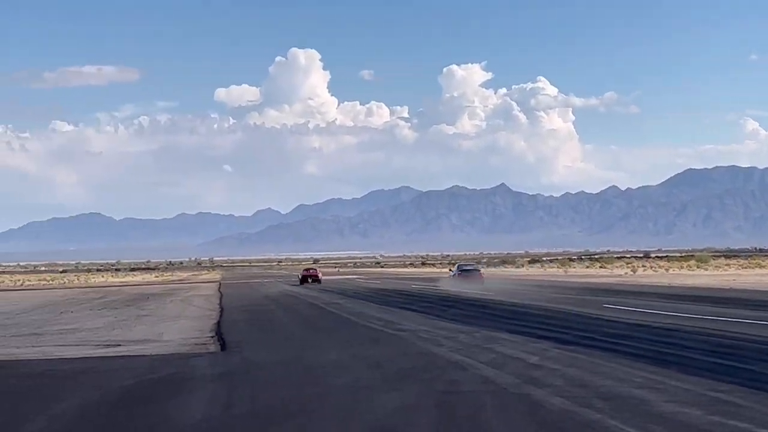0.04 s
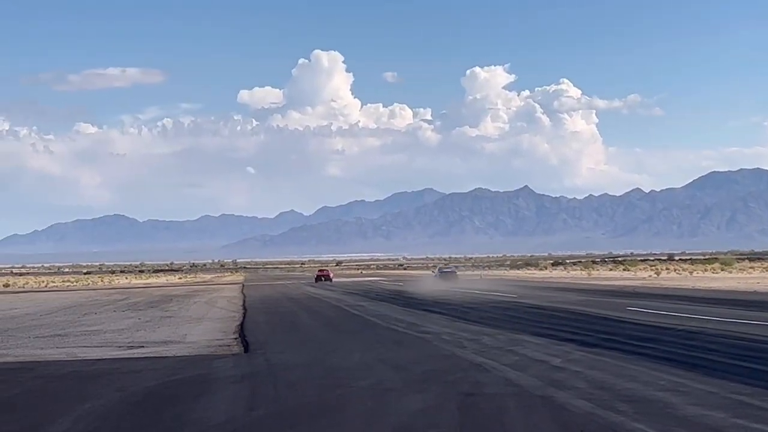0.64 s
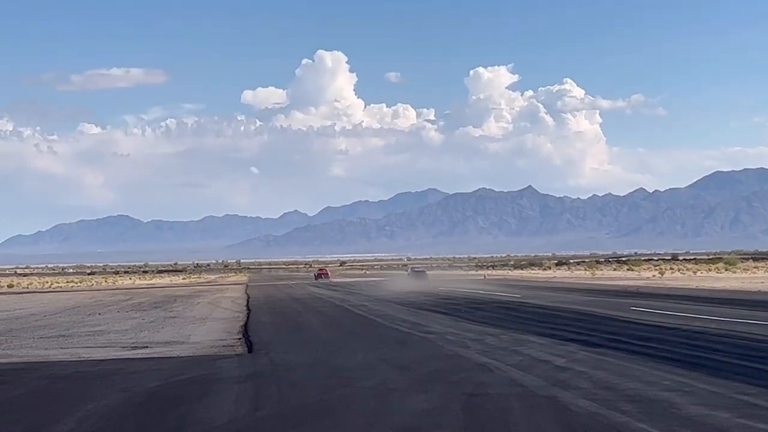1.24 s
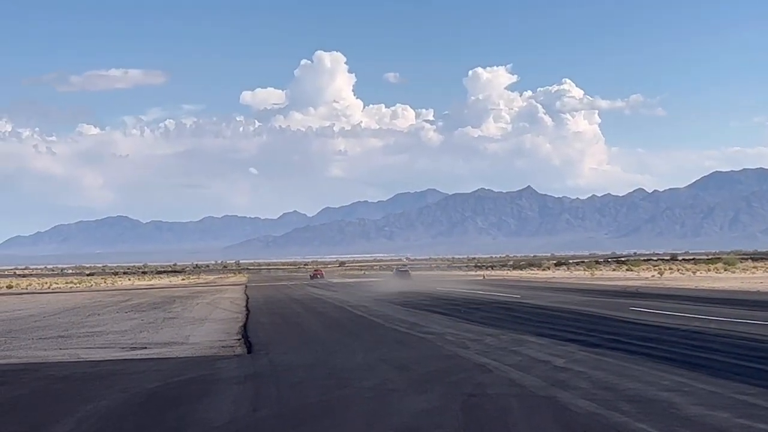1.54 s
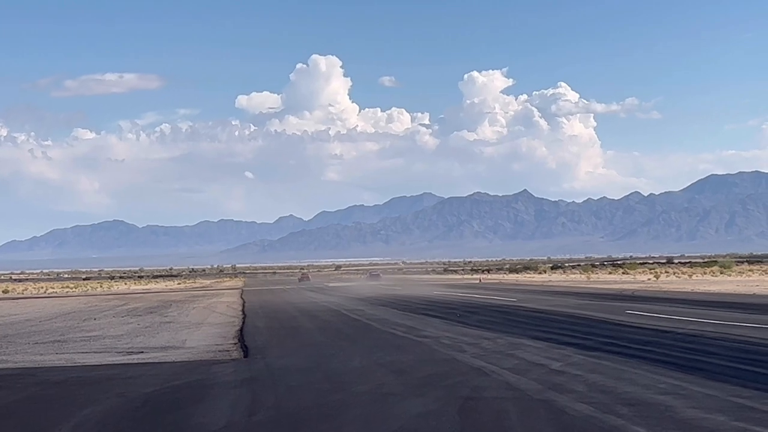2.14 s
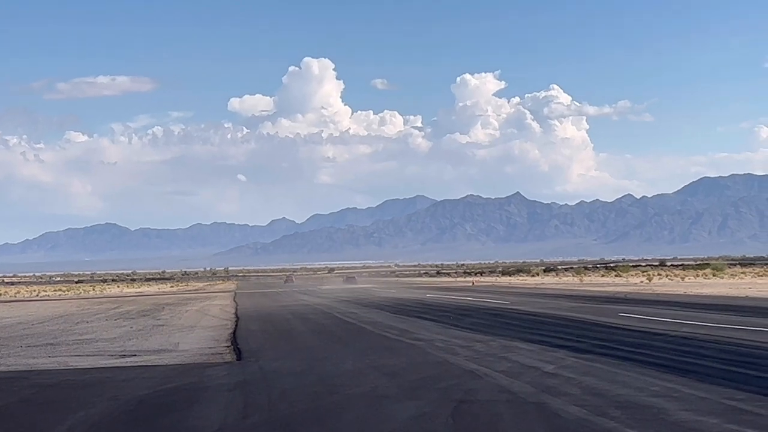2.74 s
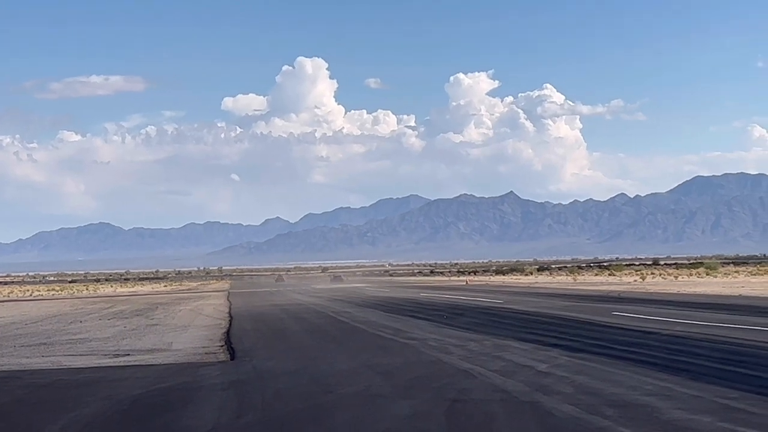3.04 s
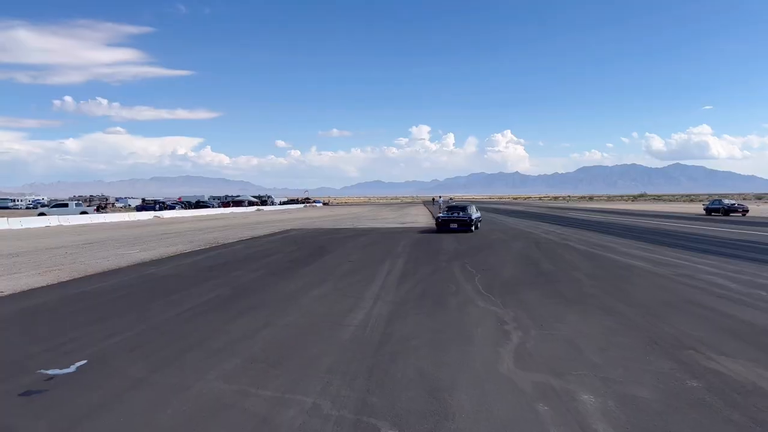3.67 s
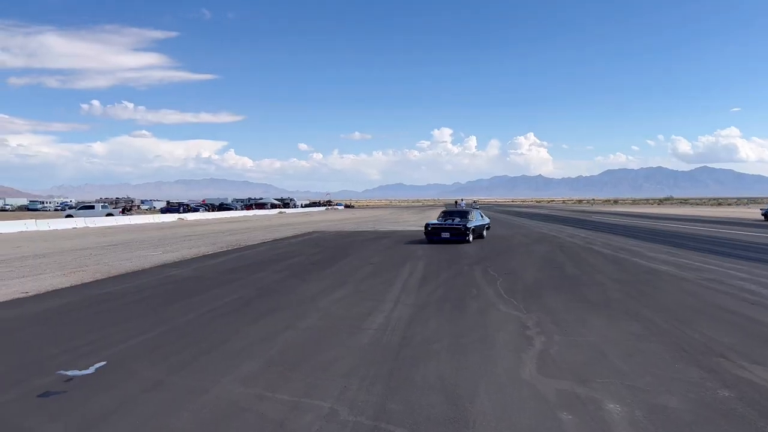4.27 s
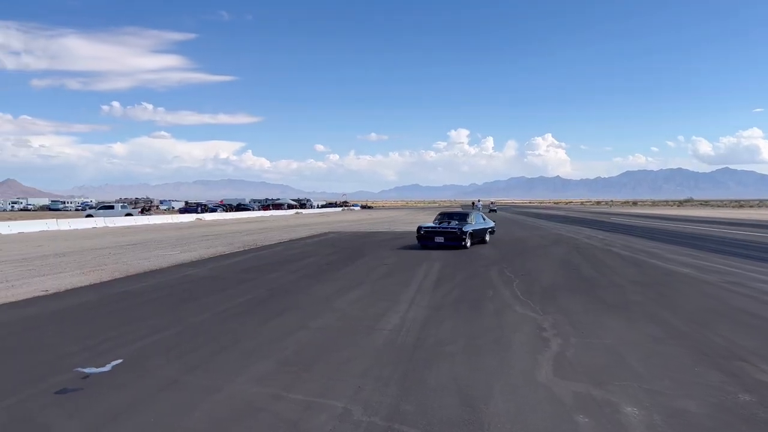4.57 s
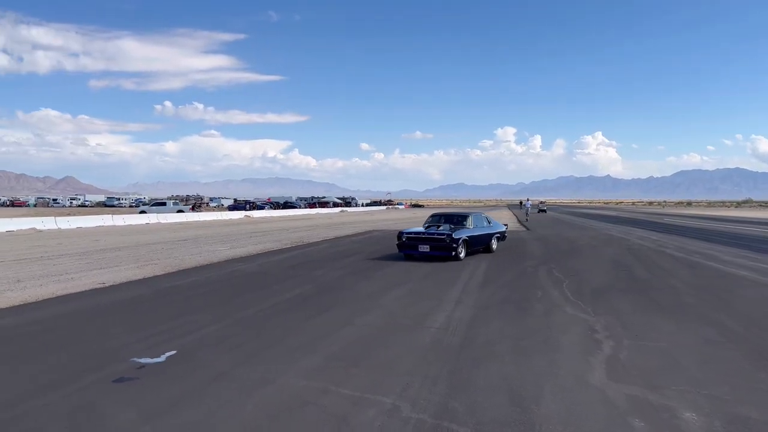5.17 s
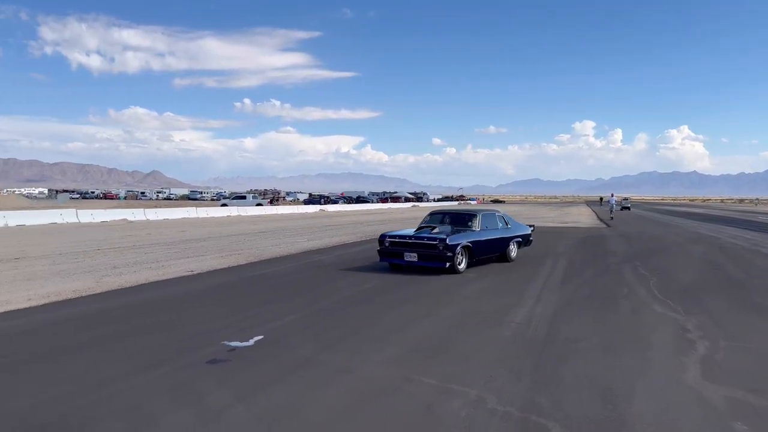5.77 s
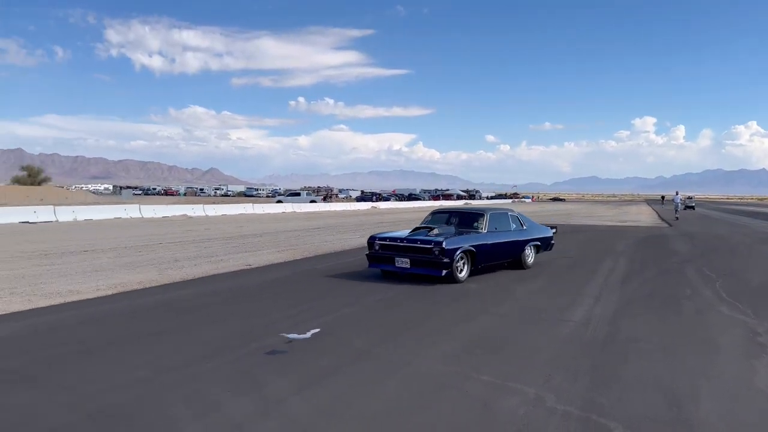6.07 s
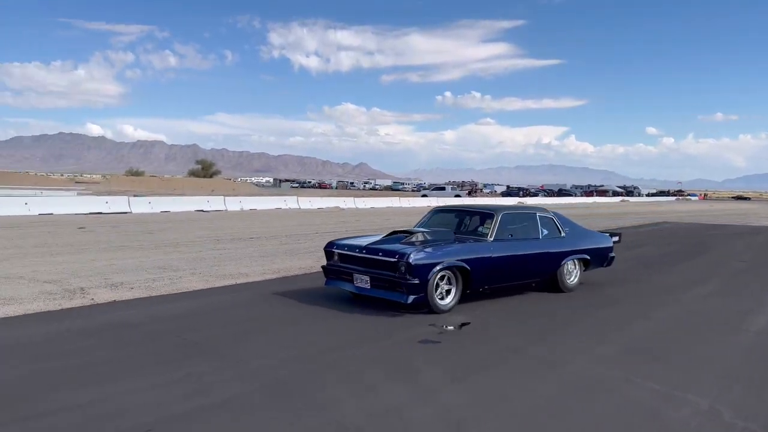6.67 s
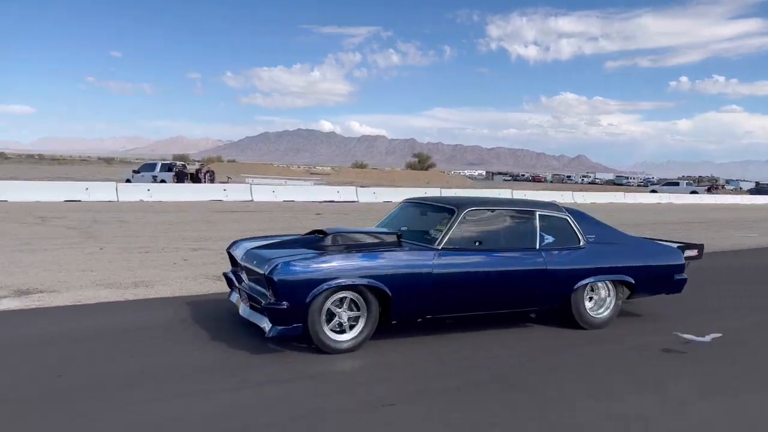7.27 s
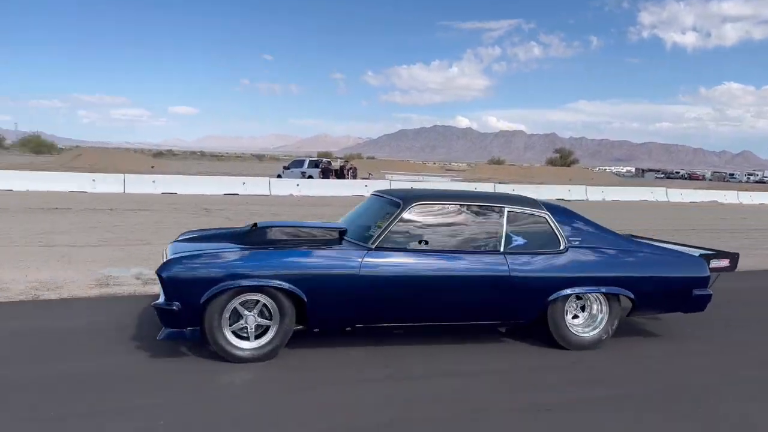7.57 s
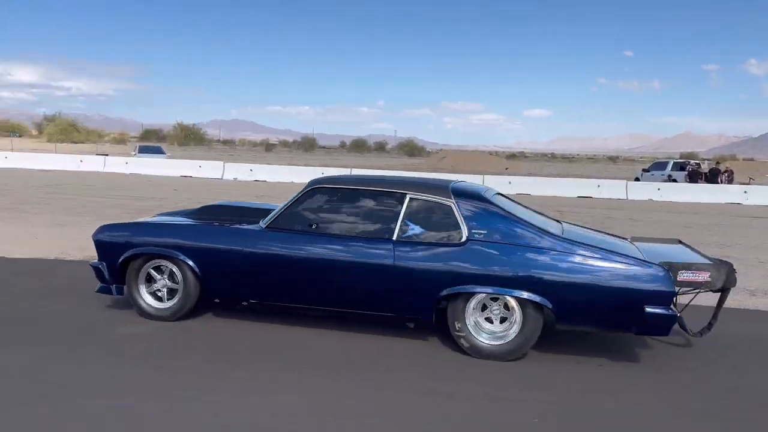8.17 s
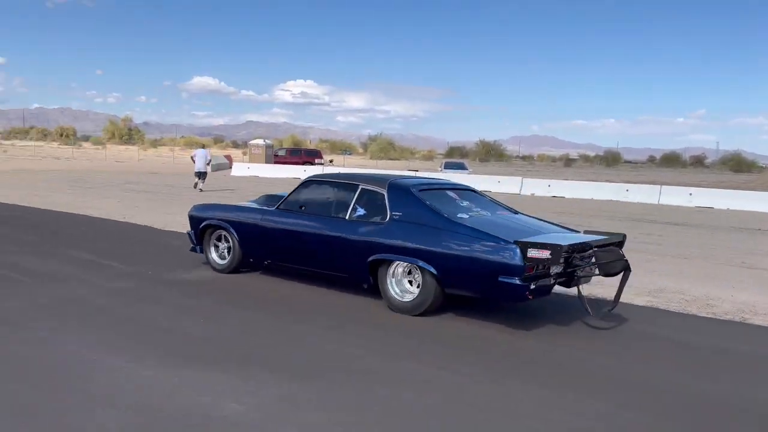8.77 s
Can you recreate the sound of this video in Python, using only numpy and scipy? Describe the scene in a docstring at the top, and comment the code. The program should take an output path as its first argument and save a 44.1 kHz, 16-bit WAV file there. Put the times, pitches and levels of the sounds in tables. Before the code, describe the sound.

Outdoors on a wide airstrip, the wavering whine of two racing engines recedes from the microphone, dips at the gear changes and stops, leaving a faint rumble and breeze. The sound then switches suddenly to a big, loud V8 rolling slowly by at close range. Its deep, uneven idle throbs at first, then turns raspier, spitting and barking as the open exhaust comes alongside, before dropping suddenly into the distance at the very end.

```python
"""Two race cars wail away flat out down an open desert airstrip, shift, fade and lift off.
Then a big V8 drag car rolls past a few metres away at a fast, lumpy idle: its open pipes boom,
and between the throbs they bark. For the last moment the idle is farther off.
The racers are harmonics of the engine cycle over turbulent noise. The V8 throbs as two pipe tones
beat; its firing pulses ring the pipes and chop the escaping gas into growl and crackle."""
import sys
import numpy as np
from scipy import signal
from scipy.fft import rfft, irfft, next_fast_len
from scipy.io import wavfile
from scipy.ndimage import uniform_filter1d, minimum_filter1d, map_coordinates

SR = 44100
rng = np.random.default_rng(int(sys.argv[2]) if len(sys.argv) > 2 else 0)


def log_audio(samples):
    """Write samples as a 16-bit WAV file to the path given in sys.argv[1]."""
    # one column per channel
    frames = np.atleast_2d(samples).T
    # limit to full scale, then quantise
    limited = np.clip(frames, -1, 1)
    pcm = np.round(limited * 32767).astype(np.int16)
    wavfile.write(sys.argv[1], SR, pcm)


N = 397782
TIME, FREQS = np.arange(N) / SR, np.maximum(np.arange(N // 2 + 1) * SR / N, 1)
LIFT_OFF_S, ARRIVES_S, LEAVES_S = 2.88, 3.636, 8.89   # the throttles close; the V8 is near; it is far
GONE = TIME > LEAVES_S


def from_db(db):
    """Decibels to amplitude ratio."""
    return 10 ** (np.asarray(db) / 20)

def rms_one(x):
    """Scale to unit power."""
    return x / np.sqrt(np.mean(x ** 2) + 1e-20)

def in_time(rows):
    """Each column of a curve, interpolated at every sample."""
    s, *columns = np.transpose(rows)
    return [np.interp(TIME, s, c) for c in columns]

def at_hz(points):
    """A spectrum interpolated over log frequency."""
    hz, value = np.transpose(points)
    return np.interp(np.log(FREQS), np.log(hz), value)

def filtered(x, gain):
    """Multiply the spectrum by a frequency response."""
    size = next_fast_len(N, True)
    response = np.interp(np.arange(size // 2 + 1) * SR / size, FREQS, gain)
    return irfft(rfft(x, size) * response, size)[..., :N]

def resonance(x, hz, width):
    """Two like damped resonators in series; unit power."""
    r = np.exp(-np.pi * width / SR)
    for _ in range(2):
        x = rms_one(signal.lfilter([1, 0, -1], [1, -2 * r * np.cos(2 * np.pi * hz / SR), r * r], x))
    return x

def delayed(channels, lag):
    """A variable delay, in samples."""
    return np.array([map_coordinates(c, [np.arange(N) - lag], order=3, mode="nearest") for c in channels])

def drift(rate_hz):
    """Low-passed random fluctuation of unit spread."""
    r = np.exp(-80 * np.pi * rate_hz / SR)
    slow = signal.lfilter([1], [1, -2 * r, r * r], rng.standard_normal(N // 40 + 2002))[2000:]
    return np.interp(np.arange(N) / 40, np.arange(len(slow)), rms_one(slow))

def noise():
    """Two uncorrelated white noises."""
    return rng.standard_normal((2, N))

def coloured(spectrum, drive):
    """Partial coherence: mid and side drives make a stereo sound of this spectrum and unit power."""
    # likeness of left and right: frequency_hz, coherence
    likeness = [(30, .6), (70, .75), (130, .88), (290, .8), (640, .78), (1400, .62), (3500, .62),
                (8000, .8), (15000, .85)]
    alike, gain = at_hz(likeness), from_db(at_hz(spectrum))
    mid = filtered(drive[0], gain * np.sqrt(1 + alike))
    side = filtered(drive[1], gain * np.sqrt(1 - alike))
    return rms_one(np.array([mid + side, mid - side]))

def turned(speed):
    """Engine cycles completed: the integral of speed."""
    return np.cumsum(in_time(speed)[0]) / SR

def whole_turns(phase):
    """The samples at which a phase completes a turn."""
    return np.flatnonzero(np.diff(np.floor(phase)) > 0)

def bursts(times_s, level_db, spread_db, rise_s, decay_s):
    """Envelope of transients: each rises fast and decays exponentially."""
    out, age, chance = np.zeros(N), np.arange(SR // 10) / SR, rng.standard_normal(N)
    shape = (1 - np.exp(-(age / rise_s) ** 2)) * np.exp(-age / decay_s)
    for s, db, luck in zip(times_s, level_db, chance):
        start = int(s * SR)
        out[start:start + len(age)] += (from_db(db + spread_db * luck) * shape / shape.max())[:N - start]
    return out

def engine_tone(cycles, orders, waver_db, waver_hz, smear_rad):
    """Harmonics of the engine cycle, modulated in amplitude and phase; the smear is that of order 8."""
    tone = 0
    for order, db in orders:
        amplitude = from_db(db + waver_db * drift(waver_hz))
        phase = 2 * np.pi * (order * cycles + rng.random())
        tone += amplitude * np.sin(phase + smear_rad * order / 8 * drift(waver_hz))
    return tone

def leading_racer():
    """Periodic firing gives a tone at order 8 amid other harmonics, all wavering in restless air."""
    # engine speed: time_s, cycle_hz
    speed = [(0, 45.9), (.3, 45.0), (.42, 45.1), (.55, 46.2), (.95, 46.8), (1.12, 46.1), (1.47, 47.1),
             (1.62, 46.7), (1.75, 46.85), (2.02, 45.8), (2.28, 42.7), (2.75, 43.65), (2.95, 43.5)]
    # loudness: time_s, firing_db, overtones_db
    levels = [(0.03, -41, -28), (0.06, -36.5, -33.5), (1.24, -32, -34.5), (1.32, -36, -33.5),
              (1.41, -27.5, -33.5), (1.99, -34.5, -40.5), (2.28, -44, -47.5), (2.58, -37, -41),
              (2.86, -38.5, -46.5)]
    # harmonics around the firing tone: order, level_db
    orders = [(2, -12.5), (3, -16.5), (4, -6), (5, -10.5), (6, -11), (7, -16.5), (9, -9), (10, -3),
              (11, -5.5), (12, -15), (13, -13), (14, -17.5), (15, -15), (16, -6.5), (17, -12), (18, -12),
              (19, -14), (20, -15.5), (21, -16.5), (23, -26), (24, -23), (26, -30), (29, -24)]
    cycles = turned(speed)
    firing_db, overtones_db = in_time(levels)
    firing = engine_tone(cycles, [(8, 0)], waver_db=1.2, waver_hz=6, smear_rad=.05)
    overtones = engine_tone(cycles, orders, waver_db=3.5, waver_hz=4, smear_rad=.12)
    return from_db(firing_db + 2.8) * firing + from_db(overtones_db - 1.8) * overtones

def chasing_racer():
    """A second harmonic series: its pitch drops at the upshift, its treble sinks with distance."""
    # engine speed: time_s, cycle_hz
    speed = [(0, 51.2), (.38, 50.5), (.6, 52), (1.0, 52.5), (1.13, 43), (1.4, 42.4), (1.75, 42.4),
             (1.95, 43.2), (2.9, 43.6)]
    # loudness: time_s, level_db, upper_overtones_db
    levels = [(0, -45.5, 10.5), (.4, -52, 7.5), (.9, -45, 7.5), (1.15, -44.5, -14), (1.4, -42, 4.5),
              (2.0, -40, -9), (2.35, -45.5, -13), (2.9, -43.5, -20)]
    # harmonics: order, level_db
    orders = [(2, -16.5), (3, -8.5), (4, 3), (5, -1.5), (6, -9.5), (8, 0.5), (9, -4.5), (10, -15.5),
              (12, -25.5), (16, -2), (17, -16.5), (18, -18.5), (19, -16.5), (23, -18)]
    # wail at the octave of the firing tone: time_s, boost_db
    wail = [(0, 0), (.2, 5), (.5, 2), (.65, 0)]
    level_db, bright_db = in_time(levels)
    wail_db, = in_time(wail)
    voiced = [(k, db + bright_db * (k > 8) + wail_db * (k == 16)) for k, db in orders]
    return from_db(level_db) * engine_tone(turned(speed), voiced, waver_db=4, waver_hz=.92, smear_rad=.12)

def far_roar(throttle):
    """The racers' low broadband noise attenuates with distance and drops at lift-off."""
    # roar: frequency_hz, density_db
    spectrum = [(15, -45.5), (25, -18), (32, -9.5), (38, -5.5), (107, -0.5), (172, 3), (419, -8),
                (447, -9.5), (726, -24), (800, -20), (1200, -43.5), (1560, -70), (2640, -120)]
    level_db = -39.5 - 1.33 * TIME - 2.5 * (1 - throttle)
    return from_db(level_db + 2.6 * drift(8)) * coloured(spectrum, noise())

def far_rasp(throttle):
    """Exhaust turbulence attenuates with distance; faint knocks sound in the lull after lift-off."""
    # rasp: frequency_hz, density_db
    spectrum = [(240, -29.5), (400, -3), (461, -5.5), (517, -4.5), (571, -12.5), (815, -4.5), (1040, -12),
                (1210, -12.5), (1460, -22.5), (1900, -27.5), (2930, -32.5), (8900, -57), (10600, -78.5),
                (15600, -117)]
    # knocks: start_s, level_db
    knocks = [(3.286, -55), (3.407, -51), (3.434, -49)]
    knock_s, knock_db = np.transpose(knocks)
    knocking = bursts(knock_s, knock_db - 9, spread_db=0, rise_s=.002, decay_s=.01)
    upshift_dip_db = 4 * np.exp(-((TIME - 2.32) / .19) ** 2)   # the leader changes up
    level = throttle * from_db(-39 - 4.5 * TIME - upshift_dip_db) + from_db(-72) + knocking
    return level * from_db(.7 * drift(11) + 1.1 * drift(1.5)) * coloured(spectrum, noise())

def breeze():
    """Wind at the listener: low pressure fluctuations, largely common to both sides."""
    # gust strength: time_s, level_db
    gusts = [(0, -49), (.9, -61.5), (1.6, -58), (2.0, -42.5), (2.8, -48.5), (3.6, -57)]
    # wind: frequency_hz, density_db
    spectrum = [(15, -24.5), (32, -11), (60, 8), (100, -8), (200, -20.5), (600, -92)]
    level = from_db(in_time(gusts)[0] + 2 * drift(4))
    return level * rms_one(filtered(noise() + 1.7 * rng.standard_normal(N), from_db(at_hz(spectrum))))

def exhaust_surges():
    """Swells of band-limited noise turn the racers' exhaust briefly hoarse or sizzling."""
    # hoarse moments: centre_s, length_s, level_db
    hoarse_swells = [(1.318, .15, -34), (1.915, 0.23, -36.5)]
    # bright moments: centre_s, length_s, level_db
    sizzle_swells = [(.08, 0.28, -62), (1.1, .25, -68), (1.45, 0.33, -69)]
    # hoarseness: frequency_hz, density_db
    spectrum = [(150, -18), (230, -6.5), (480, 1.5), (600, -9), (800, -2.5), (950, -20.5), (1500, -46),
                (3000, -120)]
    hoarse, sizzle = (sum(from_db(db) * np.exp(-(2 * (TIME - s) / length) ** 4) for s, length, db in rows)
                      for rows in (hoarse_swells, sizzle_swells))
    return hoarse * coloured(spectrum, noise()) + sizzle * resonance(noise(), hz=3050, width=900)

def racers():
    """Engines, roar and wind superpose; the engine tones stop as the throttles close."""
    throttle = np.clip(1 - (TIME - LIFT_OFF_S) / .041, 0, 1)
    engines = leading_racer() + chasing_racer()
    background = far_roar(throttle) + far_rasp(throttle) + breeze()
    return ((engines + exhaust_surges()) * throttle + background) * from_db([[.35], [-.35]])

def side_on(s):
    """Aspect of the V8: 0 while it faces the listener, 1 once its pipes are in view."""
    return np.interp(s, [5.3, 6.7], [0, 1])

def firings(cycles, jitter_s, uneven_db):
    """A pulse train, eight to the cycle, uneven in time and strength."""
    at = whole_turns(8 * cycles)
    timing, strength = rng.standard_normal((len(at), 2)).T
    pulses = np.zeros(N)
    pulses[np.clip(at + (jitter_s * SR * timing).astype(int), 0, N - 1)] = from_db(uneven_db * strength)
    return rms_one(pulses)

def boom(cycles, lope):
    """Beating: the pipes' strong tone and a lower one interfere destructively once in every lope."""
    # depth of the beat: time_s, lower_to_upper_ratio
    throb = [(3.7, 0.49), (4.3, 0.94), (4.75, 0.59), (5.05, 1.67), (5.3, 0.64), (5.7, 0.44), (6.2, 0.43),
             (6.9, 0.64), (7.4, 0.51), (8.8, 0.22)]
    # harmonics spread by uneven firing: order, level_db
    orders = [(5, -26), (6, -27), (7, -8), (8, -8), (9, -7.5), (10, -8), (12, -30), (13, -19.5),
              (14, -15.5), (15, -13.5), (16, -17.5), (19, -20.5), (20, -24.5)]
    # deep shudder: frequency_hz, density_db
    shudder = [(15, -19), (30, -32), (45, -4), (65, 16.5), (90, 21), (130, -32.5)]
    ratio, = in_time(throb)
    upper = np.exp(2j * np.pi * 11 * cycles)
    tone = upper * (1 - ratio * np.exp(-2j * np.pi * lope)) / np.sqrt(1 + ratio ** 2)
    # strong pressure waves steepen in the pipe and gain overtones
    steepened = np.imag(tone + .047 * (.53 * tone ** 2 + .15 * tone ** 3))
    uneven = .5 + .55 * side_on(TIME - 1)   # lumpier once the car is alongside
    lumps = uneven * engine_tone(cycles, orders, waver_db=2.4, waver_hz=2, smear_rad=.4)
    return rms_one(steepened + lumps) + from_db(-22) * coloured(shudder, noise())

def barks(cycles, lope, growl_db, hiss_db):
    """Exhaust transients, on the lope and off it: start_s, growl_db, crack_db, burn_s."""
    # the hardest barks: start_s, growl_db, crack_db, burn_s
    hard_barks = [(5.725, -21, -25, .06), (5.827, -20, -28, .035), (5.878, -16, -23, .05),
                  (5.974, -19, -24, .085), (6.117, -17, -24, .065), (6.2, -18, -29, .025),
                  (6.268, -18, -29, .04), (6.321, -14, -28, .05), (6.412, -14, -27, .03),
                  (6.465, -10, -26, .018), (6.513, -13, -29, .022), (6.559, -14, -29, .022),
                  (6.613, -13, -27, .024), (6.708, -14, -27, .025), (6.76, -13, -27, .02),
                  (6.805, -16, -28, .025), (6.86, -14, -25, .018), (6.906, -14, -28, .018),
                  (7.002, -17, -24, .028), (7.053, -11, -24, .018), (7.144, -17, -23, .025),
                  (7.201, -14, -21, .015), (7.249, -18, -28, .022), (7.298, -16, -21, .03),
                  (7.355, -11, -21, .028), (7.404, -16, -23, .024), (7.46, -17, -25, .025),
                  (7.504, -12, -21, .018), (7.553, -17, -18, .024), (7.611, -12, -20, .032),
                  (7.657, -13, -23, .03), (7.707, -14, -23, .02), (7.767, -13, -21, .014),
                  (7.836, -14, -22, .012), (7.865, -18, -23, .012), (7.895, -17, -23, .011),
                  (7.924, -11, -20, .014), (7.995, -13, -20, .012), (8.016, -17, -24, .012),
                  (8.054, -16, -22, .012), (8.083, -17, -21, .02), (8.146, -14, -21, .022),
                  (8.208, -13, -21, .018), (8.24, -18, -24, .018), (8.307, -16, -22, .016),
                  (8.487, -15, -24, .024), (8.556, -15, -18, .008), (8.608, -17, -25, .014),
                  (8.69, -19, -26, .012), (8.72, -19, -27, .014), (8.761, -16, -23, .012),
                  (8.791, -15, -25, .018), (8.85, -17, -25, .022)]
    stray_share, strays_from_s, gap_s, burn_s = .2, 7.3, .021, .019
    regular = whole_turns(lope)
    at = np.concatenate([regular, whole_turns(8 * cycles)])
    stray, s = np.arange(len(at)) >= len(regular), at / SR
    strength_db = 1.5 * rng.standard_normal(len(at)) + 5 * stray - 2 * (1 - side_on(s))
    # with the pipes side-on, stray firings bark too
    sounds = ~stray | ((rng.random(len(at)) < stray_share) & (s > strays_from_s))
    hard = np.array(hard_barks)
    since = s[:, None] - hard[:, 0]
    clear = ((since < -gap_s) | (since > hard[:, -1] + gap_s)).all(axis=1)   # away from any hard bark
    ordinary = np.column_stack([s, growl_db[at] + 1 + strength_db, hiss_db[at] + 4.5 + strength_db,
                                np.full(len(s), burn_s)])
    return np.vstack([hard, ordinary[sounds & clear & (s > ARRIVES_S)]]).T

def afterburn(bark_s, level_db, length_s):
    """Envelope of combustion: after each bark unburnt fuel burns on, then goes out."""
    out, age = np.zeros(N), np.arange(SR // 6) / SR
    for s, db, length in zip(bark_s, level_db, length_s):
        start = int(s * SR)
        shape = (1 - np.exp(-age / .0067)) * np.exp(-(age / length) ** 2)
        out[start:start + len(age)] += (from_db(db) * shape)[:N - start]
    return out

def growl(flow_db, gas, kicks, bark_s, bark_db, burn_s):
    """Amplitude modulation: midrange gas noise is chopped by the firings and leaps at each bark."""
    # growl: frequency_hz, density_db
    spectrum = [(250, 3.5), (420, -3.5), (469, -2), (550, 2), (676, -1.5), (780, 5), (974, -4.5),
                (1110, -5), (1270, -9), (1450, -6), (1710, -11.5), (1970, -10), (2150, -12), (2410, -12.5),
                (2800, -18.5), (3640, -18.5), (6160, -120)]
    barking = bursts(bark_s, bark_db - 10, spread_db=.8, rise_s=.0012, decay_s=.006)
    level = from_db(flow_db) + barking + afterburn(bark_s, bark_db - 13, burn_s)
    return level * coloured(spectrum, noise() * gas + .17 * kicks)

def snaps(bark_s, snap_db):
    """Envelope of the attack: a bark opens with a hard spit and a short sizzle."""
    spit = bursts(bark_s, snap_db - 9, spread_db=2.5, rise_s=.0005, decay_s=.0014)
    return spit + bursts(bark_s, snap_db - 7, spread_db=1.5, rise_s=.003, decay_s=.0025)

def header_rings(bark_s, bark_db, snap_db, spread_db=2.8, detune=.018):
    """Free vibration: each bark rings the exhaust headers; returns the low modes and the high ones."""
    # header modes: pitch_hz, width_hz, level_db
    modes = [(638, 17, -4.5), (801, 56, -0.5), (1269, 46, -10.5), (1478, 87, -8), (1989, 20, -15.5),
             (2386, 34, -18), (2990, 22, -16), (3500, 37, -11), (3887, 23, -15), (4175, 78, -7),
             (5010, 30, -15), (5570, 59, -16.5), (5850, 76, -10), (6600, 32, -14), (8100, 87, -10)]
    hz, width, db = np.transpose(modes)
    high, age = hz > 2800, np.arange(SR // 25)[:, None] / SR
    rise_s = np.where(high, .003, .0015)
    shape = (1 - np.exp(-(age / rise_s) ** 2)) * np.exp(-np.pi * width * age)
    shape /= shape.max(axis=0)
    out, chance = np.zeros((2, N + len(age))), rng.standard_normal((len(bark_s), 3, len(hz)))
    for s, low_db, high_db, (luck, sharp, turn) in zip(bark_s, bark_db, snap_db, chance):
        strength = from_db(np.where(high, high_db, low_db) + db + spread_db * luck)
        rings = strength * shape * np.sin(2 * np.pi * (hz * (1 + detune * sharp) * age + turn))
        start = int(s * SR)
        out[:, start:start + len(age)] += [rings @ ~high, rings @ high]
    return out[:, :N]

def crackle(gas):
    """Fast random modulation roughens the treble of the escaping gas, more so side-on."""
    # crackle: frequency_hz, density_db
    spectrum = [(1530, -15), (2000, -2), (2450, 3), (2720, -17), (2960, 7.5), (3130, 1), (3500, 6),
                (3830, 6), (4230, 7.5), (4750, 2), (4970, 2.5), (5350, 0), (6350, 1.5), (8780, -2.5),
                (10200, -7), (12400, -7.5), (13700, -26), (15100, -6), (16000, -16), (17000, -60)]
    flicker_db = (3.5 * drift(400) + 1.3 * drift(80)) * (.5 + .5 * side_on(TIME))
    return coloured(spectrum, noise() * gas * from_db(flicker_db))

def front_rasp(gas, growl_db):
    """Directivity: resonant bands of engine noise face forward and fade as the car turns."""
    # bands: centre_hz, width_hz, level_db
    bands = [(1628, 85, -15), (2800, 270, -25)]
    # strength relative to the growl: time_s, level_db
    levels = [(3.65, 4), (4.0, 0), (4.09, 4), (4.25, 2), (5.3, -2), (6.5, -19)]
    rasp = sum(from_db(db) * resonance(rng.standard_normal(N) * gas, hz, width) for hz, width, db in bands)
    return from_db(growl_db + in_time(levels)[0]) * rasp

def beam(start, end, fade_s=.083):
    """1 while a radiation lobe covers the listener, fading in and out."""
    return np.interp(TIME, [start - fade_s, start, end, end + fade_s], [0, 1, 1, 0])

def radiated(x):
    """Resonances beam past as the car turns; an echo between body and asphalt acts as a comb filter."""
    # lobes, silent if they end before they start: centre_hz, width_hz, extra_gain, start_s, end_s
    lobes = [(2750, 450, .5, 4.03, 4.15), (3310, 120, 0.29, 3.7, 6.5), (3930, 200, 0.63, 3.15, 5.8),
             (7200, 170, 0.47, 3.3, 5.3), (1960, 67, 0.32, 5.5, 6.6), (2500, 99, 1.3, 6.2, 5.9),
             (6520, 290, 1.6, 8.8, 6.75), (4200, 220, 0.95, 7.25, 7.7), (3480, 200, .3, 7.6, 8.3),
             (4260, 170, 1.0, 8.45, 7.8)]
    # close reflection: time_s, delay_ms, share
    echo = [(3.6, 1.48, .3), (5.0, 1.51, .27), (5.6, 1.6, .3), (6.4, 1.6, .33), (7.2, 1.42, .15),
            (8.1, 1.42, .22), (8.8, 1.55, .22)]
    for hz, width, gain, start, end in lobes:
        x = x + gain * beam(start, end) * signal.lfilter(*signal.iirpeak(hz, hz / width, fs=SR), x)
    delay_ms, share = in_time(echo)
    return x + share * delayed(x, delay_ms * SR / 1000)

def hot_gas_colour(x):
    """Time-varying resonance: hot gas makes narrow bands swell and sink from bark to bark."""
    for hz in np.geomspace(1000, 5400, 11):
        gain = from_db(3.6 * np.clip(drift(22), -2, 1.8) - .7)
        x = x + (gain - 1) * signal.lfilter(*signal.iirpeak(hz, Q=9, fs=SR), x)
    return x

def tailpipe_hum(pulses):
    """Forced resonance: firings ring the pipe mouths, each heard while its beam covers the listener."""
    # hums: pitch_hz, width_hz, level_db, start_s, end_s
    mouths = [(354, 13, -25.5, 4.72, 4.82), (358.3, 14, -28.5, 5.35, 5.6), (145.6, 30, -20.5, 7.05, 7.8),
              (319, 104, -25, 6.15, 6.8), (286, 58, -23, 7.05, 7.6), (274.3, 65, -24.5, 8.0, 8.9),
              (341, 27, -23.5, 8.1, 8.55)]
    drive, hum = pulses + .5 * rng.standard_normal(N), 0
    for hz, width, db, start, end in mouths:
        tone = resonance(drive, hz, width)
        evened = tone / np.sqrt(uniform_filter1d(tone ** 2, size=SR // 12) + 1e-6)
        hum += from_db(db) * beam(start, end) * evened
    return hum

def at_the_ears(body, crack):
    """Interaural differences of time, phase and level; the highest hiss varies with the car's bearing."""
    # bearing: time_s, right_lag_samples, top_hiss_db
    bearing = [(3.6, 0.34, 2.5), (4.5, 2.3, 5), (5.3, 3.6, 4), (6.0, 1.0, -7), (6.6, 1.4, 4.5),
               (7.0, 1.8, 3), (7.6, 2.7, 1), (8.3, 3.7, 2), (9.02, 3.6, -4)]
    # phase lag of the crackle on the right: frequency_hz, lag_rad
    phase_lag = [(2000, .5), (4000, 1.2), (6000, 1.4), (8500, 2.0), (12000, 1.5)]
    # balance: frequency_hz, left_minus_right_db
    lean = [(100, .3), (300, .6), (600, 1.5), (850, 4), (1200, 7.5), (2000, 1), (3500, -.5), (5500, 1.5),
            (12000, 0)]
    ear_lag, top_db = in_time(bearing)
    top = filtered(crack, np.interp(FREQS, [5500, 9000], [0, 1]))
    crack = radiated(crack + (from_db(top_db) - 1) * top)
    left = body[0] + crack[0]
    right = delayed([body[1]], ear_lag)[0] + filtered(crack[1], np.exp(-1j * at_hz(phase_lag)))
    lean_db = at_hz(lean)
    return np.array([filtered(left, from_db(lean_db / 2)), filtered(right, from_db(-lean_db / 2))])

def near_v8():
    """Source and filter: firing pulses ring the open pipes and modulate the escaping gas."""
    # idle speed: time_s, cycle_hz
    idle = [(3.63, 10.6), (3.8, 10.65), (4.1, 11.0), (4.3, 11.0), (4.55, 10.85), (4.85, 10.6), (5.1, 10.1),
            (5.33, 9.65), (5.6, 9.78), (5.95, 9.75), (6.2, 10.05), (6.6, 9.95), (7.05, 9.9), (7.28, 9.55),
            (7.6, 9.5), (7.95, 9.2), (8.25, 9.35), (8.6, 9.15), (9.02, 8.8)]
    # the lope slips forward in the engine cycle: time_s, lead_turns
    slip = [(3.63, .33), (4.0, .42), (4.5, .72), (4.85, .98), (5.4, 1.2), (5.9, 1.2), (6.1, 1.45),
            (6.42, 1.5), (6.9, 1.76), (7.1, 2.08), (7.55, 2.22), (8.05, 2.1), (8.4, 2.8), (9.02, 3.6)]
    # loudness as the car passes: time_s, boom_db, pipe_db, growl_db, hiss_db
    levels = [(3.65, -10, -15.5, -25.5, -45.5), (4.15, -8, -22, -25.5, -46.5), (4.36, -10, -19, -26, -44.5),
              (4.55, -10, -15.5, -22.5, -43), (4.75, -8, -20.5, -24, -42.5), (5.25, -7, -24, -24, -42.5),
              (5.75, -8.5, -20.5, -24.5, -35.5), (6.3, -7.5, -17.5, -21, -39), (6.9, -7, -18.5, -23, -37.5),
              (7.5, -11.5, -18.5, -20.5, -33.5), (8.3, -14.5, -21.5, -22, -32),
              (8.85, -20, -24.5, -23, -35.5)]
    # pipe response: frequency_hz, density_db
    pipe_spectrum = [(74, -24.5), (125, 0.5), (140, -4.5), (185, -8), (221, -15), (275, -13), (350, -12),
                     (409, -18), (470, -28), (610, -20), (1030, -120)]
    cycles = turned(idle)
    lope = 2 * cycles + in_time(slip)[0]   # about two throbs a cycle
    boom_db, pipe_db, growl_db, hiss_db = in_time(levels)
    bark_s, bark_db, crack_db, burn_s = barks(cycles, lope, growl_db, hiss_db)
    snap_db = crack_db - 6 * (1 - side_on(bark_s))   # softer head-on
    pulses = firings(cycles, jitter_s=.00065, uneven_db=7.5)
    kicks = (pulses - pulses.mean()) * [[1], [0]]   # in the mid drive only
    puffs = rms_one(signal.lfilter([1], [1, -np.exp(-1 / (.036 * SR))], pulses))
    gas = rms_one(.98 + .54 * puffs)
    barks_so_far = np.interp(TIME, np.sort(bark_s), np.arange(len(bark_s)))
    flow = np.cos(2 * np.pi * (barks_so_far - .33))   # weakest just before a bark
    distance_gain = from_db(-11 * GONE)

    low = from_db(boom_db + .33 - 2.7 * GONE) * boom(cycles, lope)
    pipe = from_db(pipe_db + 3) * coloured(pipe_spectrum, noise() * [[.8], [1.2]] + .66 * kicks)
    growling = growl(growl_db + .5 + 2.2 * flow, gas, kicks, bark_s, bark_db, burn_s)
    hiss_level = from_db(hiss_db - 3 + 2.7 * flow)
    crack_level = hiss_level + snaps(bark_s, snap_db) + afterburn(bark_s, crack_db - 9, burn_s)
    low_rings, high_rings = header_rings(bark_s, bark_db, snap_db)
    crack = from_db(-9 * GONE) * crack_level * crackle(gas) + distance_gain * from_db(-2) * high_rings
    rasp = .72 * radiated(distance_gain * (growling + low_rings) + front_rasp(gas, growl_db))
    body = low + distance_gain * (pipe + tailpipe_hum(pulses)) + rasp
    return hot_gas_colour(at_the_ears(body, crack))

def scene():
    """The far race gives way abruptly to the near car."""
    near = np.clip((TIME - ARRIVES_S) / .002, 0, 1)
    return (1 - near) * racers() + near * near_v8()

def record(dry):
    """Band and peak limiting: the deepest bass and the top are cut, and peaks are held down."""
    thinned = signal.sosfilt(signal.butter(3, 24, "high", fs=SR, output="sos"), dry)
    over_db = np.maximum(20 * np.log10(np.abs(thinned).max(axis=0) / .8 + 1e-9), 0)
    gain_db = uniform_filter1d(minimum_filter1d(-over_db, size=300), size=300)
    return signal.sosfilt(signal.cheby2(14, 70, 16900, fs=SR, output="sos"), thinned * from_db(gain_db))


dry = scene()
out = record(dry)
log_audio(out)
```